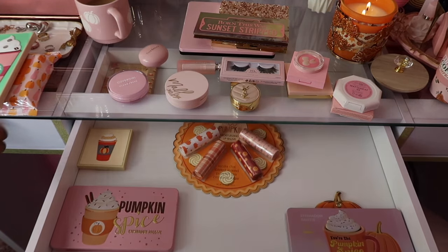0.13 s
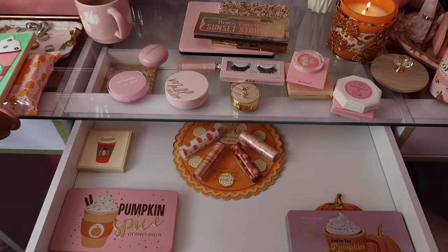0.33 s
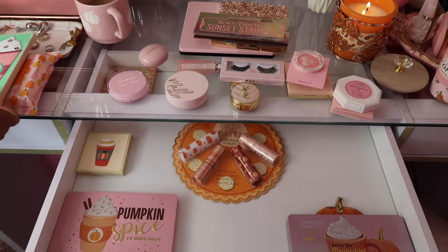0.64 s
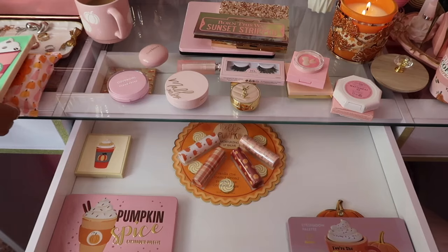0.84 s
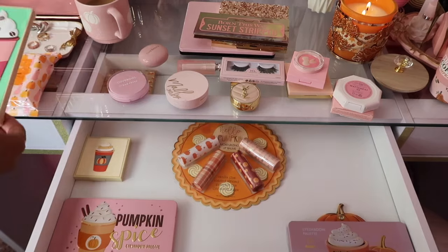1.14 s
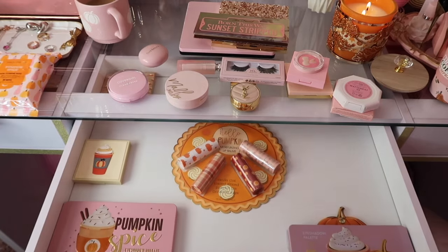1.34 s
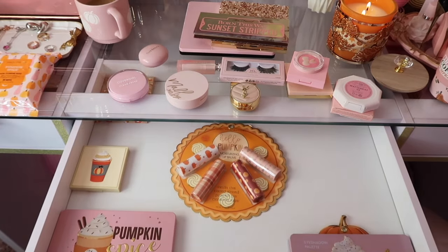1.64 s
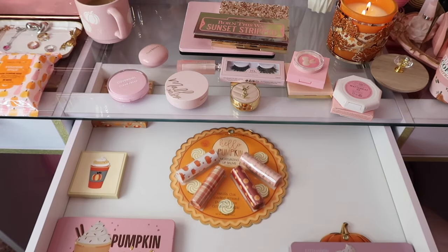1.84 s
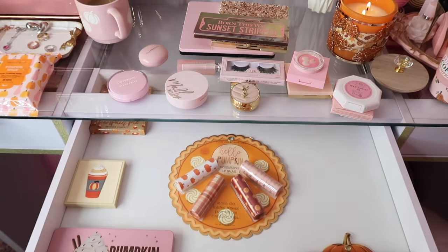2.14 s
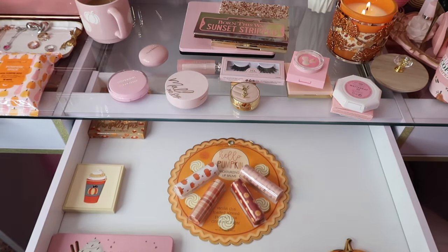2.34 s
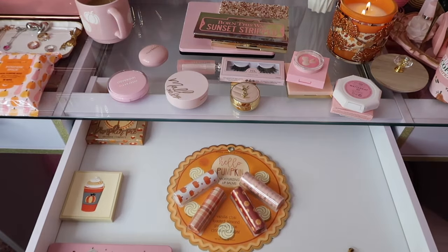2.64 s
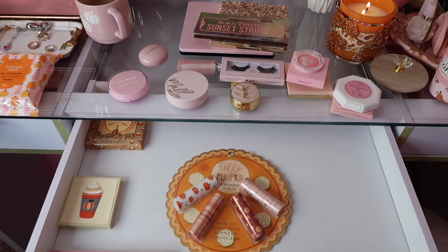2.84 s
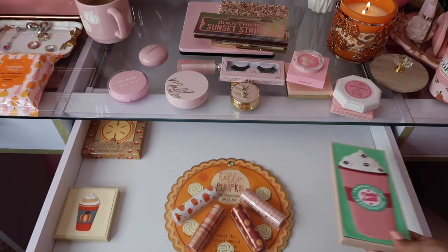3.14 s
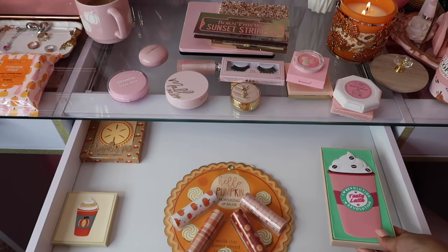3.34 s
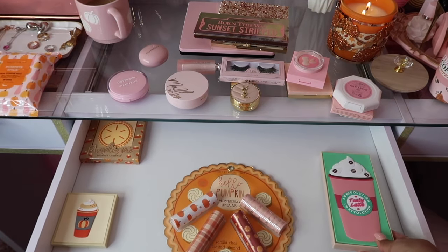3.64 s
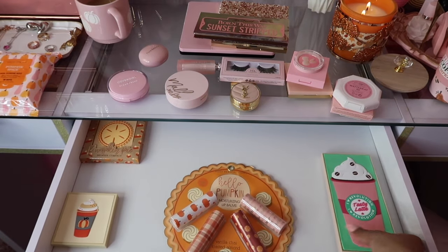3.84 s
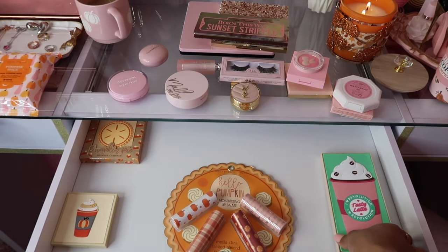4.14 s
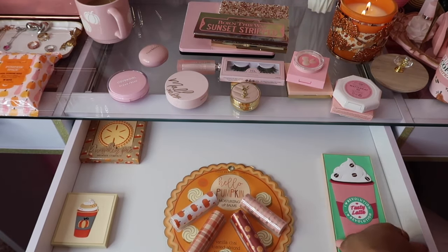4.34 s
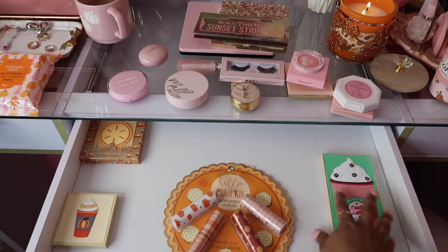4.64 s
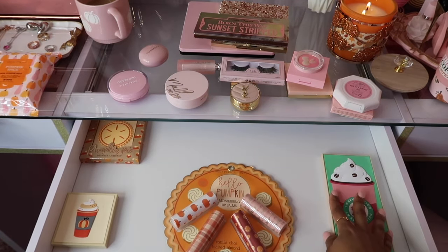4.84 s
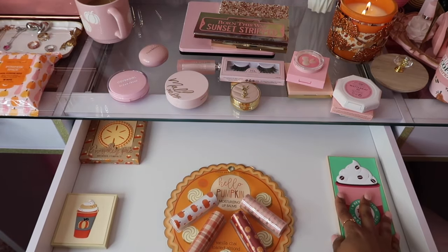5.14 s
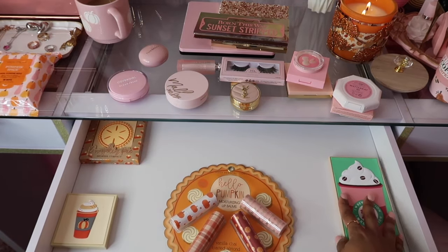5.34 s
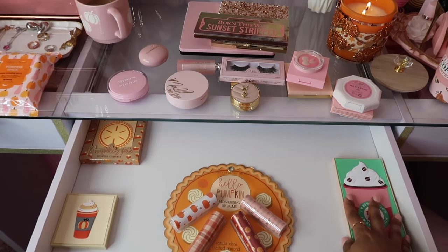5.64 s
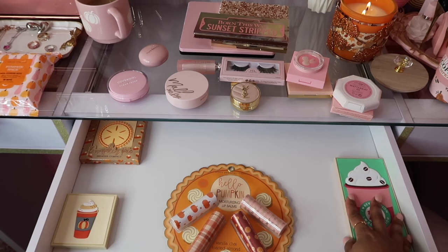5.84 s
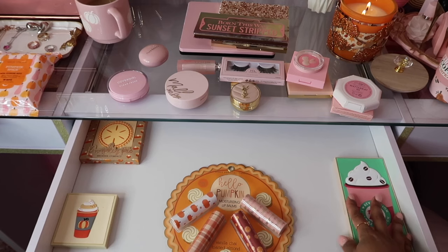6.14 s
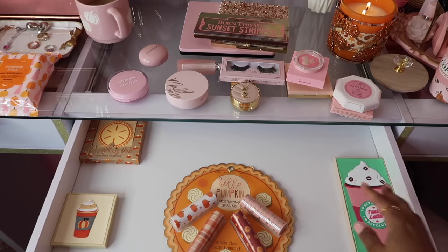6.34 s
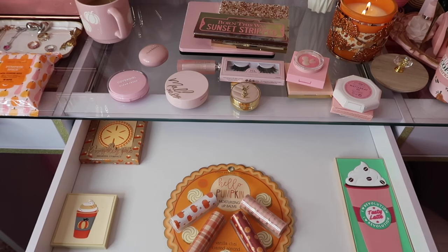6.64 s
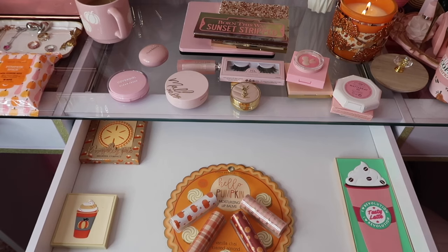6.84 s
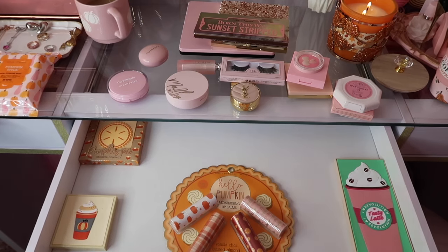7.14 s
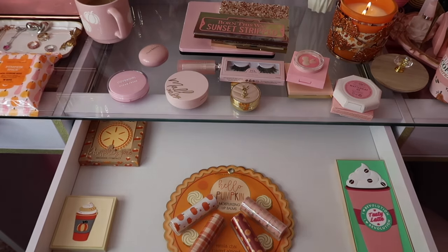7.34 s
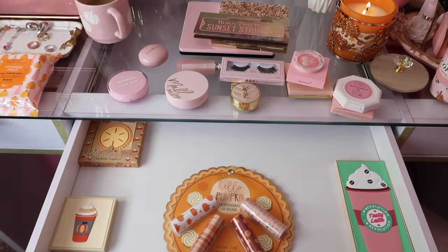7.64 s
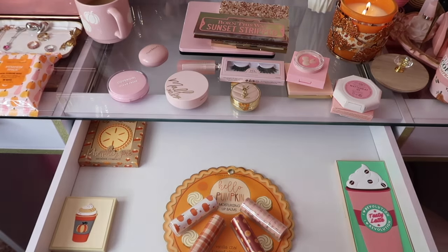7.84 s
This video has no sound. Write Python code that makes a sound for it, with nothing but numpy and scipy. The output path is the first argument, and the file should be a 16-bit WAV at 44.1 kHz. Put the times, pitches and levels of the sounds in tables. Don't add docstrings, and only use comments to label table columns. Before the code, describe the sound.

Close stereo microphones in a quiet room hear a wooden drawer's faint low rumble with small clicks and knocks. Past the middle of the fourth second, a flat card palette lands with a woody clack, its edge drops and chatters, then a hard flat slap hits loudest. Afterward come only soft fingertip presses, small taps and light skin-on-card rubbing.

```python
import sys
import numpy as np
from scipy import signal
from scipy.io import wavfile
from scipy.ndimage import uniform_filter1d

SR = 44100
rng = np.random.default_rng(int(sys.argv[2]) if len(sys.argv) > 2 else 0)


def log_audio(samples):
    frames = np.atleast_2d(samples).T
    limited = np.clip(frames, -1, 1)
    pcm = np.round(limited * 32767).astype(np.int16)
    wavfile.write(sys.argv[1], SR, pcm)


def gain_from_db(level_db):
    decades = np.asarray(level_db, float) / 20
    return 10 ** decades


N = 352396

# f/Hz, level/dB, T60/s
DRAWER_MODES = [(87.4, 4.5, .16), (104, 6, 0.08), (184, 4.5, 0.21), (236, -19.5, 0.051), (267, -11, 0.02),
                (324, -8, 0.14), (382, -3, 0.073), (499, -2.5, 0.077), (584, -11.5, 0.19), (617, -3, .1),
                (780, -21, 0.061),
                (862, -5, 0.1), (963, 1.5, 0.084), (1066, -0.5, 0.037), (1218, -4.5, 0.11),
              (1356, 1.5, 0.027), (1595, -1, 0.028), (1691, -3, 0.039), (1820, -2, 0.026),
              (2180, -4, 0.019), (2360, 0, 0.028), (2940, 1.5, 0.033), (3530, 9.5, 0.0097),
              (4610, -6.5, 0.044), (5800, -4.5, 0.014)]
PART_EDGES_HZ = [200, 700, 2200]

# f/Hz, density level/dB
TAIL_SPECTRUM = [(59, -42.5), (100, -8), (257, -6.5), (383, 6), (1000, -19.5), (1320, -10.5), (2130, -31),
                 (9260, -56), (13200, -41.5), (15000, -96.5)]
# f/Hz, correlation/1
TAIL_CORRELATION = [(60, 1.0), (180, 1.0), (540, 1.0), (1630, 0.91), (4910, 0.72), (14800, -1)]
# f/Hz, T60/s
TAIL_T60 = [(300, 0.2), (1000, 0.2), (4000, 0.17), (12000, 0.18)]

# t/s, level/dB
ROLL_LEVEL = [(0.0, -46), (2.0, -44.5), (2.31, -43), (2.58, -48.5), (2.89, -41.5), (3.38, -48.5),
              (3.61, -48), (3.75, -48), (4.5, -43.5), (5.12, -50.5), (6.1, -48.5), (7.19, -50.5),
              (7.99, -58)]
# f/Hz, density level/dB
ROLL_SPECTRUM = [(18, -37), (30, -6), (93, -5), (236, -9.5), (338, -20.5), (379, -28), (832, -26),
                 (1500, -34), (1950, -61), (3300, -120)]
# f/Hz, density level/dB
SCUFF_SPECTRUM = [(200, -10.5), (500, 4.5), (1000, 3.5), (2000, -1.5), (3500, -6), (7000, -14),
                  (14000, -31)]
# f/Hz, density level/dB
HUSH_SPECTRUM = [(13, -42), (22, -19), (82, 0), (134, -25), (171, 9.5), (207, -12.5), (280, -7.5),
                 (540, -13.5), (636, -22), (771, -18.5), (3660, -29), (11900, -43), (15200, -44.5)]
# f/Hz, correlation/1
HUSH_CORRELATION = [(60, 0.99), (130, 0.97), (290, 0.34), (630, 0.036), (1390, 0.11), (3060, 0.14),
                    (6720, 0.26), (14800, -0.2)]

# middle t/s, level/dB, length/s, centre f/Hz
SLIDES = [
    (0.24, -58.5, 0.12, 1800),
    (1.484, -61, 0.29, 1580),
    (2.232, -54.5, 0.046, 1240),
    (4.094, -51, 0.0075, 1550),
    (5.26, -67.5, .15, 1500),
    (7.217, -59.5, 0.045, 1210),
    (7.649, -57.5, 0.042, 1860),
]
# t/s, panel peak level/dB, favoured f/Hz, card level/dB, click level/dB
KNOCKS = [(1.031, -34.5, 222, -12.5, -36), (1.041, -42.5, 520, -6, -36), (1.099, -45.5, 240, -8, -22),
          (1.169, -31, 843, -6.5, -18), (1.176, -35, 1410, -3, -13), (2.103, -42, 493, -6, -11),
          (2.112, -32, 260, -21, -37), (2.288, -38.5, 328, 0.3, -12.5), (2.301, -38.5, 466, -18, -12),
          (2.349, -46, 298, -12, -11), (2.384, -33, 340, -2.5, -15), (2.396, -28, 309, -0.5, -14.5),
          (2.403, -34.5, 657, -1, -31), (2.463, -57, 296, -5, 8), (5.824, -23, 407, -16, -30.5),
          (6.526, -42, 340, -4.5, -10.5), (6.705, -31, 338, -17, -36), (6.713, -25.5, 230, -20.5, -45),
          (6.939, -35.5, 236, -15, -30), (6.954, -38, 320, -9, -27), (7.279, -44, 418, -1.5, -7)]
# t/s, panel peak level/dB, favoured f/Hz, thud level/dB
PRESSES = [(2.123, -28.5, 295, -42), (2.48, -40.5, 296, -5), (2.738, -35.5, 325, -13),
           (3.668, -56, 283, 15), (5.189, -45.5, 330, -19), (5.389, -49, 580, -14), (5.589, -43, 380, -21),
           (5.847, -36.5, 375, -25), (6.149, -43, 294, -7), (6.254, -41, 238, -9), (6.483, -39, 342, -22),
           (6.871, -34.5, 226, -21), (6.969, -43.5, 346, 3), (7.159, -39.5, 276, -10),
           (7.183, -39.5, 288, -9)]
# t/s, panel peak level/dB, favoured f/Hz, card level/dB, click level/dB
FLAT_LANDINGS = [
    (3.552, -11, 360.6, -4.5, -18),
    (3.563, -20.5, 355, -7, -35),
    (4.046, -38.5, 383, -1, -31),
    (4.278, -30.5, 560, -5, -18.5),
    (4.2915, -29, 510, 2, -9),
    (4.295, -8.5, 398, -8, -12),
    (4.322, -28.5, 374, -12.5, -21.5),
    (4.524, -45, 523, 1.5, -18),
]
# t/s, panel peak level/dB, favoured f/Hz, card level/dB, click level/dB
EDGE_LANDINGS = [
    (3.752, -10.5, 426, -5.5, -17.5),
    (3.763, -19, 637, -10, -20.5),
    (3.777, -22.5, 610, -4.5, -21),
    (3.802, -30.5, 620, -11, -26),
    (3.868, -26.5, 548, -2, -10),
    (4.007, -28.5, 359, -10.5, -25),
    (4.029, -37.5, 600, -3.5, -24),
    (4.066, -34, 1506, -2.5, -9),
    (4.305, 0, 362.7, -9, -23),
]
# peak t/s, level/dB, swell/s, fade/s
STROKES = [(1.2, -56, .1, .12), (2.11, -62, .015, 0.024), (2.3, -54, 0.068, 0.061),
           (2.391, -49, .012, 0.14), (2.755, -58.5, .02, 0.067), (3.62, -68, .01, .05),
           (3.9, -58, .01, 0.043), (4.07, -56.5, .15, 0.23), (5.07, -62, 0.054, 0.04),
           (5.39, -57.5, .08, 0.071), (5.608, -52, .045, 0.13), (6.53, -52.5, .006, 0.038),
           (7.296, -55, .2, .12), (7.6, -57.5, 0.12, 0.039), (7.808, -55.5, .012, .04)]

TRAVEL_S = 0.0009


def rms_one(x):
    return x / np.sqrt(np.mean(x ** 2) + 1e-20)


def in_time(rows, outside_db=-120):
    s, db = np.transpose(rows)
    return gain_from_db(np.interp(np.arange(N) / SR, s, db, left=outside_db, right=outside_db))


def at_hz(points, hz):
    points = np.array(points)
    return np.interp(np.log(hz), np.log(points[:, 0]), points[:, 1])


def drift(rate_hz):
    r = np.exp(-80 * np.pi * rate_hz / SR)
    chance = rng.standard_normal(N // 40 + 2002)
    slow = signal.lfilter([1], [1, -2 * r, r * r], chance)[2000:]
    return np.interp(np.arange(N) / 40, np.arange(len(slow)), rms_one(slow))


def noise_bands(correlation):
    edges = 22 * 2 ** np.arange(0, 9.6, 0.5)
    white = rng.standard_normal((2, 2, N))
    for k, (low, high) in enumerate(zip(edges, edges[1:])):
        centre = np.sqrt(low * high)
        band = signal.butter(2, [low, high], "band", fs=SR, output="sos")
        mid, side = signal.sosfilt(band, white[k % 2])
        alike = np.clip(at_hz(correlation, centre), -1, 1)
        yield centre, np.sqrt(1 + alike) * mid + np.sqrt(1 - alike) * side * [[1], [-1]]


def surroundings():
    roll = in_time(ROLL_LEVEL) * gain_from_db(1.5 * drift(24) - 6.0)
    scuff = strokes() * gain_from_db(1.5 * drift(53))
    hush_out, roll_out, scuff_out = 0, 0, 0
    for hz, noise in noise_bands(HUSH_CORRELATION):
        noise = noise * gain_from_db(1.25 * drift(30))
        hush_out = hush_out + gain_from_db(at_hz(HUSH_SPECTRUM, hz)) * noise
        if hz < 1500:
            roll_out = roll_out + gain_from_db(at_hz(ROLL_SPECTRUM, hz)) * np.roll(noise, N // 3, axis=1)
        scuff_out = scuff_out + gain_from_db(at_hz(SCUFF_SPECTRUM, hz)) * np.roll(noise, N // 2, axis=1)
    hush_db = -51.5
    return gain_from_db(hush_db) * rms_one(hush_out) + roll * rms_one(roll_out) + scuff * rms_one(scuff_out)


def slides():
    t = np.arange(N) / SR
    out, white = np.zeros((2, N)), rng.standard_normal((2, N))
    for s, db, length, hz in SLIDES:
        near = np.abs(t - s) < 3 * length
        band = signal.butter(2, hz * 2 ** np.array([-0.5, 0.5]), "band", fs=SR, output="sos")
        both_sides = white[:, near] + 0.55 * white[::-1, near]
        swish = rms_one(signal.sosfilt(band, both_sides))
        out[:, near] += gain_from_db(db) * np.exp(-((t[near] - s) / length) ** 2) * swish
    return out


def touches():
    rows = []
    for table, thud_db in [(KNOCKS, -24), (FLAT_LANDINGS, -9.5), (EDGE_LANDINGS, -18.5)]:
        for s, panel_db, hz, card_db, click_db in table:
            rows.append((s, panel_db, hz, thud_db, card_db, click_db))
    for s, panel_db, hz, thud_db in PRESSES:
        rows.append((s, panel_db, hz, thud_db, -26, -45))
    return np.array(rows)


def strikes(hz, extra_db):
    s, panel_db, _, thud_db, card_db, click_db = touches().T
    part_db = [thud_db, 0, card_db, click_db][np.searchsorted(PART_EDGES_HZ, hz)]
    clicks = np.zeros(N)
    np.add.at(clicks, ((s + TRAVEL_S) * SR).astype(int), gain_from_db(panel_db + part_db + extra_db))
    return clicks


def near_spot(hz, slope_db):
    in_panel = PART_EDGES_HZ[0] < hz < PART_EDGES_HZ[1]
    return -slope_db * np.abs(np.log2(hz / touches()[:, 2])) * in_panel


def decay(x, t60):
    return signal.lfilter([1], [1, -gain_from_db(-60 / (t60 * SR))], x + 1e-18)


def ring(clicks, hz, t60):
    r, w = gain_from_db(-60 / (t60 * SR)), 2 * np.pi * hz / SR
    return signal.lfilter([0, np.sin(w)], [1, -2 * r * np.cos(w), r * r], clicks + 1e-18)


def swing(clicks, hz, t60):
    push = signal.butter(1, [hz / 1.6, hz * 1.54], "band", fs=SR)
    return ring(signal.lfilter(*push, clicks + 1e-18), hz, t60)


def edge_clicks():
    clicks = strikes(5000, 0.5)
    envelope = decay(clicks, 0.027) - decay(clicks, 0.002)
    crack = envelope * rng.standard_normal((2, N))
    band = signal.butter(2, [1200, 11500], "band", fs=SR, output="sos")
    return signal.sosfilt(band, 0.5 * crack + 0.19 * crack[0])


def spot():
    ring_t60, choke_t60 = 0.07, 0.004
    out, click = np.zeros(N + SR), np.zeros(SR // 8)
    click[0] = 1
    for s, panel_db, hz, *_ in touches():
        start = int((s + TRAVEL_S) * SR)
        here = slice(start, start + len(click))
        if gain_from_db(panel_db) > 2 * np.abs(out[here]).max():
            out[here] *= decay(click, choke_t60)
        out[here] += gain_from_db(panel_db) * swing(click, hz, ring_t60)
    return out[:N]


def drawer():
    spread_db, ring_db, slope_db, longest_t60 = 2.1, -6.0, 8.0, 0.16
    modes = DRAWER_MODES
    chance = rng.standard_normal((len(touches()), len(modes)))
    rings = 0
    for k, (hz, level_db, t60) in enumerate(modes):
        extra_db = level_db + ring_db + near_spot(hz, slope_db) + spread_db * chance[:, k]
        clicks = strikes(hz, extra_db)
        sense = 1 if hz < PART_EDGES_HZ[1] else (-1) ** k
        rings = rings + sense * swing(clicks, hz, min(t60, longest_t60))
    return rings


def scatter():
    tail_db, panel_db, slope_db, flicker_db, rise_t60 = 5.5, -1.5, 3.5, 4.0, 0.005
    out = 0
    for hz, noise in noise_bands(TAIL_CORRELATION):
        if hz > 250:
            centre = [120, 400, 1250, 3500][np.searchsorted(PART_EDGES_HZ, hz)]
            colour_db = at_hz(TAIL_SPECTRUM, hz) - at_hz(TAIL_SPECTRUM, centre) - 10 * np.log10(centre / 400)
            part_db = tail_db + panel_db * (hz < PART_EDGES_HZ[1])
            clicks = strikes(hz, part_db + near_spot(hz, slope_db) + colour_db)
            envelope = decay(clicks, at_hz(TAIL_T60, hz)) - decay(clicks, rise_t60)
            out = out + envelope * gain_from_db(flicker_db * drift(90)) * noise
    return out


def strokes():
    t = np.arange(N) / SR
    gain = np.zeros(N)
    for s, db, swell, fade in STROKES:
        away = np.maximum((s - t) / swell, (t - s) / fade)
        gain += gain_from_db(db - 10 * away)
    return gain


def scene():
    wood = (spot() + drawer()) * gain_from_db(np.array([[-0.2], [0.2]]))
    return wood + edge_clicks() + scatter() + surroundings() + slides()


def top_cut(x):
    return signal.sosfilt(signal.butter(12, 15350, fs=SR, output="sos"), x)


def record(dry):
    above_db, share, most_db = -13, 5, 7
    release_db_s, lag_s, overload_db = 7.5, 0.07, -8
    t = np.arange(N) / SR
    power = uniform_filter1d(np.mean(dry ** 2, axis=0), size=882)
    level_db = np.minimum(10 * np.log10(power + 1e-12), overload_db)
    held_db = np.maximum.accumulate(level_db + release_db_s * t) - release_db_s * t
    duck_db = np.clip(share * (held_db - above_db), 0, most_db)
    lag = np.exp(-1 / (lag_s * SR))
    ducked = dry * gain_from_db(-signal.lfilter([1 - lag], [1, -lag], duck_db))
    low_pass = signal.cheby2(10, 50, 15420, fs=SR, output="sos")
    mix = signal.sosfilt(low_pass, np.clip(ducked, -1, 1))
    return top_cut(np.clip(mix, -1, 1))


dry = scene()
out = record(dry)
log_audio(out)
```